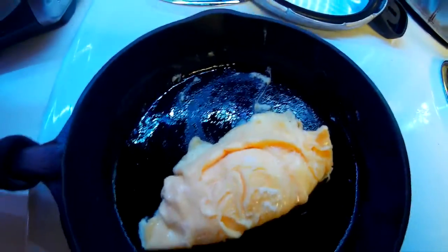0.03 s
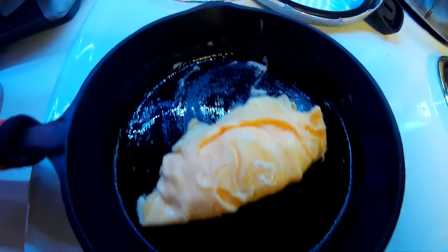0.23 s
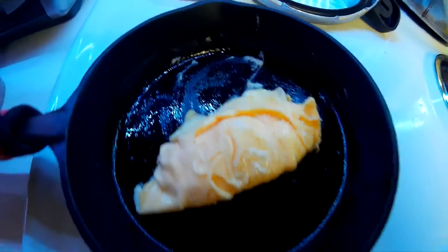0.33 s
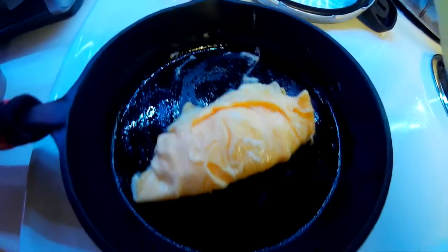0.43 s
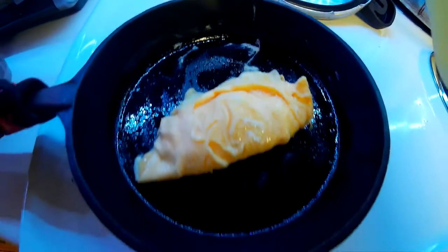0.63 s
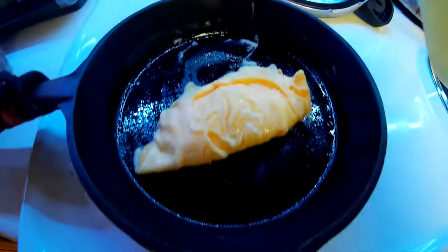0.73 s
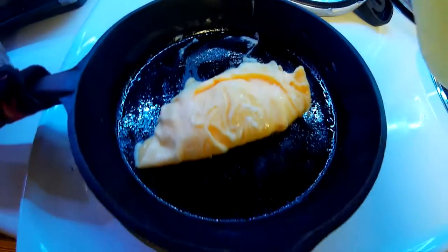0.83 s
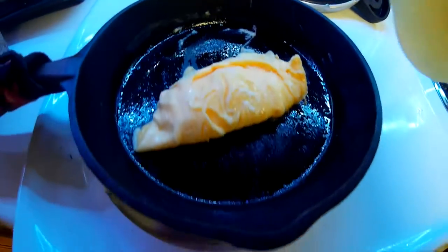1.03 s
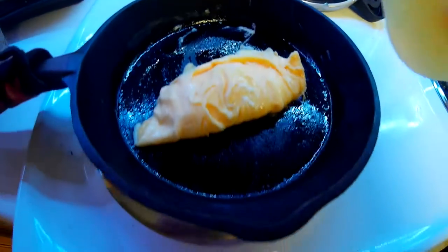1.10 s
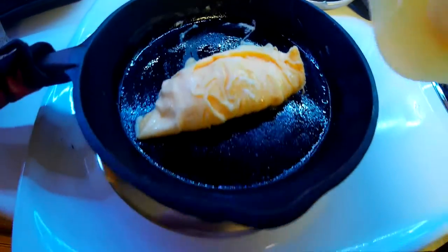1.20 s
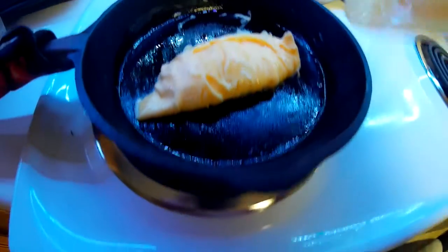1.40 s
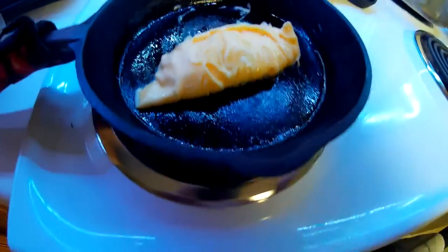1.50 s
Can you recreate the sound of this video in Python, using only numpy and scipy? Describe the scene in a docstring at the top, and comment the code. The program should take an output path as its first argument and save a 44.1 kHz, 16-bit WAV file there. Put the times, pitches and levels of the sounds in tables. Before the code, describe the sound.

A heavy cast iron skillet shoved across a stovetop with a dull, clattering thump and short scrape

```python
"""Iron skillet shoved across a stovetop

Close up in a small kitchen, a cast iron skillet rumbles, judders over the burner and scrapes to rest.
Pulses of slip force excite the decaying modes of the hollow sheet-metal top, a short thud and a dense
clatter; the scrape is a train of thousands of tiny slips and the rumble is filtered noise. A few sharp
ticks sound over steady noise shaped into hiss and low room hum, with a light sizzle of random pops."""
import sys
import numpy as np
from scipy import signal
from scipy.fft import rfft, irfft
from scipy.io import wavfile
from scipy.ndimage import uniform_filter1d

SR = 44100
rng = np.random.default_rng(int(sys.argv[2]) if len(sys.argv) > 2 else 0)


def master_out(mix):
    """Clip the mix to full scale and print it as 16-bit PCM to the path in sys.argv[1]."""
    frames = np.transpose(np.atleast_2d(mix))
    ceiling = np.clip(frames, -1, 1)
    pcm = np.round(ceiling * 32767).astype(np.int16)
    wavfile.write(sys.argv[1], SR, pcm)


N = 68355  # length of the scene in samples

# Relative spectrum of a small bright click, for ticks and grease pops: f/Hz, level/dB
CLICK_SPECTRUM = [(500, -17), (4500, -21), (5600, -7), (6250, 3.5), (6800, -6), (8000, -18), (11000, -18.5),
                  (12800, -34), (14000, -44)]


def amp(db):
    """Level-to-amplitude law: 20 dB is a factor of ten."""
    return 10 ** (np.asarray(db) / 20)


def unit(x):
    """Power normalisation: scales a signal to an rms of one."""
    return x / np.sqrt(np.mean(x ** 2) + 1e-20)


def read(points, hz):
    """Interpolation of a table along logarithmic frequency."""
    f, value = np.transpose(points)
    return np.interp(np.log(hz + 1), np.log(f + 1), value)  # the 1 Hz offset admits zero frequency


def level(points):
    """Amplitude envelope: level/dB is interpolated linearly over t/s."""
    return amp(np.interp(np.arange(N) / SR, *np.transpose(points)))


def add(mix, s, sound):
    """Superposition: adds a sound into the mix from time s (seconds)."""
    part = mix[max(round(s * SR), 0):][:len(sound)]
    part += sound[:len(part)]


def through(x, response):
    """Linear filtering: convolves with an impulse response, cut to the scene's length."""
    return signal.fftconvolve(x, response)[:N]


def colour(points, size=8192):
    """Minimum phase: the log spectrum alone fixes a causal response, here of unit energy."""
    hz = abs(np.fft.fftfreq(size, 1 / SR))
    log_gain = np.log(amp(read(points, hz)))
    # the Hilbert transform of the log gain supplies the phase
    spectrum = np.exp(np.conj(signal.hilbert(log_gain)))
    response = np.fft.ifft(spectrum).real[:size // 2]
    return response / np.linalg.norm(response)


def tail(t60s, size=256):
    """Diffuse decay: noise of unit energy, each band dying exponentially at its own rate."""
    hz, t, bands = signal.stft(rng.standard_normal(SR), SR, nperseg=size)
    decay = amp(-60 * t / read(t60s, hz)[:, None])
    ring = signal.istft(bands * decay, SR, nperseg=size)[1]
    return ring / np.linalg.norm(ring)


def steady(spectrum, size=1024):
    """Stationary noise of unit rms, modulated by faint drifting patches and broadband flicker."""
    patch_db, flicker_db = 0.9, 0.5  # rms of each modulation
    overlap = size - size // 4
    bands = signal.stft(rng.standard_normal(N + size), SR, nperseg=size, noverlap=overlap)[2]
    patches = uniform_filter1d(rng.standard_normal(bands.shape), size=16, axis=0)  # across frequency
    patches = unit(uniform_filter1d(patches, size=10, axis=1))  # across time
    flicker = rng.standard_normal(bands.shape[1])
    bands = bands * amp(patch_db * patches + flicker_db * flicker)
    noise = signal.istft(bands, SR, nperseg=size, noverlap=overlap)[1][:N]
    gain = amp(read(spectrum, np.fft.rfftfreq(N, 1 / SR)))
    return unit(irfft(rfft(noise) * gain, N))


def hiss():
    """Broadband noise: a continuous spectrum with a slowly varying level."""
    # Relative spectral density: f/Hz, level/dB per Hz
    hiss_spectrum = [(100, -4.5), (600, -1), (1000, -4.5), (1700, -5), (2200, -1.5), (2600, -4), (4500, -6),
                     (5400, -1.5), (6300, 3), (7300, -6), (9000, -14), (12000, -19), (15500, -22.5)]
    # Rms level over time: t/s, level/dB
    hiss_level = [(0, -56), (0.15, -57), (0.58, -57.5), (0.69, -54), (0.74, -57), (0.85, -54.5),
                  (1.0, -57.5), (1.12, -56.5), (1.34, -56.5), (1.55, -59)]
    return steady(hiss_spectrum) * level(hiss_level)


def hum():
    """Low-frequency noise: energy concentrated in a few bass bands is heard as room hum."""
    # Relative spectral density: f/Hz, level/dB per Hz
    hum_spectrum = [(10, -3.5), (38, 4.5), (60, -9.5), (95, -3.5), (125, -11), (165, -8), (215, -12),
                    (237, -4), (268, -6), (300, -18), (450, -18.5), (700, -39), (2000, -66)]
    return amp(-53.5) * steady(hum_spectrum)


def sizzle():
    """Random impulse train: a film of hot grease bursts in tiny pops barely above the hiss."""
    pops_per_s, pop_db, spread_db = 160, -48.5, 3  # mean rate, weakest level, exponential spread
    chance, size = rng.random(N), rng.exponential(1, N)
    pop_level = amp(pop_db + spread_db * np.minimum(size, 4))
    pops = (chance < pops_per_s / SR) * pop_level
    return through(pops, colour(CLICK_SPECTRUM))


def shove():
    """Filtered noise: the heavy pan's motion gives a low rumble under a level envelope."""
    # Envelope of the shove: t/s, level/dB
    shove_level = [(0.165, -62.5), (0.192, -42), (0.24, -37), (0.28, -37.5), (0.34, -38), (0.40, -45),
                   (0.50, -49), (0.58, -58.5)]
    # Relative spectral density of the rumble: f/Hz, level/dB per Hz
    rumble_spectrum = [(15, -14.5), (40, -1.5), (90, -5), (160, -10), (260, -7.5), (500, -22), (1000, -33),
                       (4000, -58)]
    noise = rng.standard_normal(N)
    return unit(through(noise, colour(rumble_spectrum))) * level(shove_level)


def stovetop():
    """Modal superposition: one tap on the hollow sheet-metal top sums decaying cosines."""
    # Modes of the top, levels relative: f/Hz, level/dB, T60/s
    modes = [(36.6, -10, 1), (67.8, -0.5, 0.4), (123.2, 1.5, 0.52), (231.5, 6.5, 0.46), (250.4, 10, 0.25),
             (282, 1.5, 0.3), (312, 5, 0.29), (366, 3, 0.35), (415.4, -1, 0.35), (444.4, 4.5, 0.28),
             (519, -8.5, 0.58), (564, -3, 0.46), (633.7, -2, 0.18), (737, 1.5, 0.47), (823, -3.5, 0.38),
             (1098, -2.5, 0.35), (1152, -4, 0.52), (1545, -1.5, 0.37)]
    t = np.arange(SR) / SR
    ring = np.zeros(SR)
    for hz, db, t60 in modes:
        ring -= amp(db) * 1000 ** (-t / t60) * np.cos(2 * np.pi * hz * t)
    return ring


def scrape():
    """Dry friction: rough iron catches in thousands of tiny slips, which also stir the stovetop."""
    # Envelope of the slip train: t/s, level/dB
    slide_level = [(0.17, -69), (0.225, -51), (0.25, -45), (0.285, -43), (0.325, -42.5), (0.39, -45.5),
                   (0.455, -45), (0.50, -50.5), (0.57, -69)]
    # Relative spectral density of the scrape: f/Hz, level/dB per Hz
    scrape_spectrum = [(40, -14), (160, -8), (260, 4), (450, 3.5), (650, -1.5), (1200, -14), (1600, -3.5),
                       (1850, -5), (2200, -1.5), (4500, -4.5), (5500, 0.5), (6300, 3.5), (7400, -6.5),
                       (10000, -17.5), (13000, -34), (16000, -34)]
    slips_per_s, spread_db, ring_db = 14000, 1.76, -7.5  # mean rate, exponential spread, stovetop share
    chance, size, sign = rng.random(N), rng.exponential(1, N), rng.choice([-1, 1], N)
    slips = (chance < slips_per_s / SR) * sign * amp(spread_db * np.minimum(size, 5))
    slips = unit(slips) * level(slide_level)
    ring = stovetop()
    ring = ring / np.linalg.norm(ring)
    return through(slips, colour(scrape_spectrum)) + amp(ring_db) * through(slips, ring)


def judder():
    """Impulsive excitation: each slip's soft force pulse sets off ring, thud and clatter."""
    # Slips of the pan on the burner, impulses relative: t/s, level/dB, contact time/ms
    slip_events = [(0.187, -15, 6.4), (0.207, -9.5, 5.8), (0.2386, -9.5, 1.07), (0.243, -4.5, 1.45),
                   (0.2477, -6.5, 1.15), (0.2567, -0.5, 1.67), (0.272, 1, 1.13), (0.2768, -8, 0.59),
                   (0.2886, -10, 0.91), (0.3037, -10, 0.63), (0.3174, -13.5, 0.78), (0.342, -17.5, 0.44),
                   (0.365, -17.5, 0.46), (0.396, -18, 1.6), (0.456, -20, 2), (0.487, -34, 1.4)]
    # Relative spectrum of the pan's short knock: f/Hz, level/dB
    thud_spectrum = [(25, 1), (70, -5.5), (160, -12.5), (215, -11), (255, 1), (300, 12), (360, -9.5),
                     (440, 0), (530, -22), (680, -8), (900, -14), (1500, -39), (4000, -20), (16000, -75)]
    # Relative spectrum of the dense upper modes: f/Hz, level/dB
    clatter_spectrum = [(60, -18), (160, -16.5), (250, -6), (440, -6.5), (520, -10), (850, -3.5),
                        (1000, -9), (1120, -7), (1280, -10.5), (1550, -5), (1850, -17.5), (2400, -11),
                        (5000, -19), (16000, -29)]
    # Decay of the dense upper modes: f/Hz, T60/s
    clatter_t60 = [(100, 0.28), (300, 0.46), (1000, 0.45), (4000, 0.14)]
    ring_db, thud_db, clatter_db = -42, -0.5, -3.5
    force, clatter = np.zeros(N), np.zeros(N)
    ms = np.arange(SR // 20) * 1000 / SR
    for s, db, contact_ms in slip_events:
        u = 2 * np.pi * ms / contact_ms
        pulse = u * np.exp(-u)  # nearly all of the impulse falls within the contact time
        pulse *= amp(db) / pulse.sum()
        add(force, s, pulse)
        add(clatter, s, through(tail(clatter_t60), pulse))
    ring = amp(ring_db) * through(force, stovetop())
    thud = -amp(thud_db) * through(force, colour(thud_spectrum))  # same polarity as the ring
    return ring + thud + amp(clatter_db) * through(clatter, colour(clatter_spectrum))


def ticks():
    """Impulse response: tiny hard contacts give short bright rings and a diffuse kitchen decay."""
    # Contacts: t/s, level/dB
    tick_events = [(0.2624, -14), (0.6675, -36), (0.6926, -27), (0.7088, -30)]
    # Decay of the kitchen: f/Hz, T60/s
    kitchen_t60 = [(100, .4), (1000, .35), (6000, .3), (14000, 0.17)]
    kitchen_db = -16
    clicks = np.zeros(N)
    for s, db in tick_events:
        add(clicks, s, amp(db) * colour(CLICK_SPECTRUM))
    return clicks + amp(kitchen_db) * through(clicks, tail(kitchen_t60))


def scene():
    """Linear superposition of pan and background, the same in both channels."""
    background = hiss() + hum() + sizzle()
    pan = shove() + scrape() + judder() + ticks()
    return np.array([pan + background, pan + background])


def record(dry):
    """Band limitation: a steep linear-phase low-pass removes the top treble."""
    edge_hz = 15700
    low_pass = signal.firwin(511, edge_hz, window=("kaiser", 9), fs=SR)
    return signal.oaconvolve(dry, low_pass[None], "same")


dry = scene()
out = record(dry)
master_out(out)
```